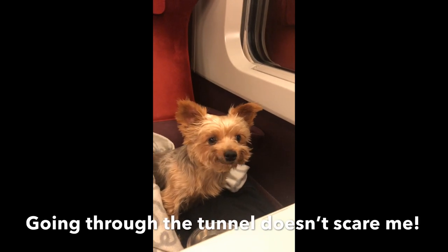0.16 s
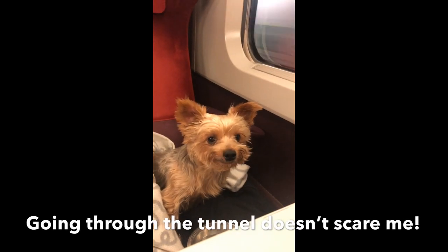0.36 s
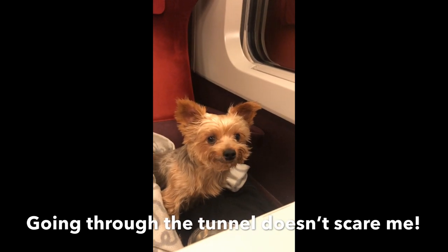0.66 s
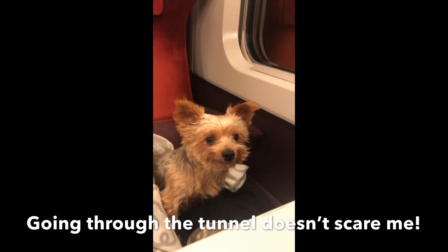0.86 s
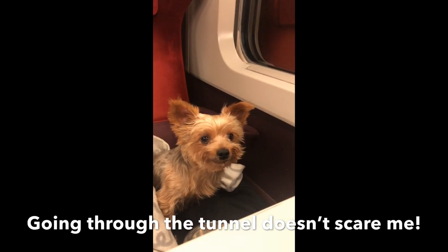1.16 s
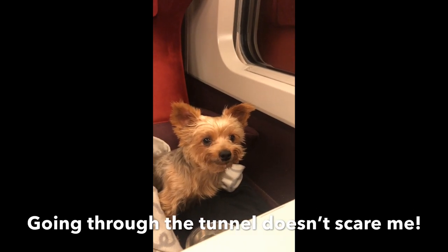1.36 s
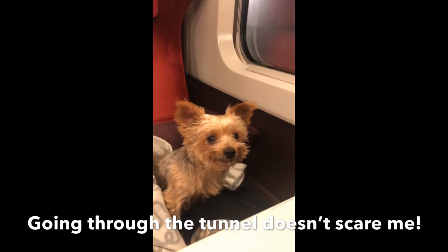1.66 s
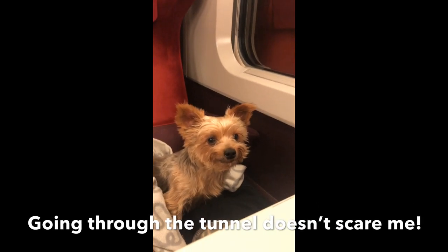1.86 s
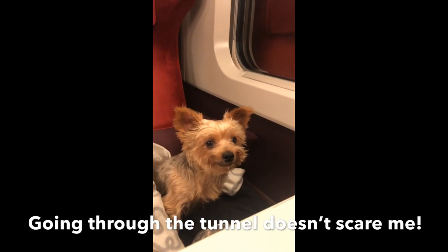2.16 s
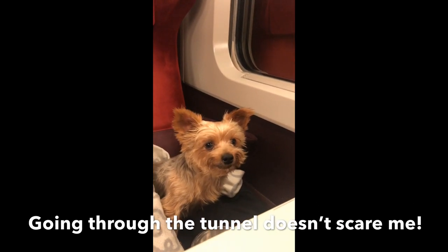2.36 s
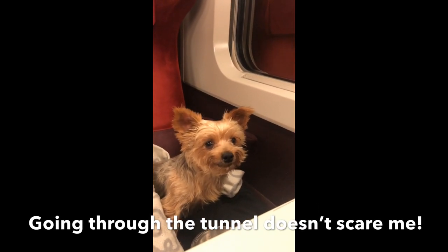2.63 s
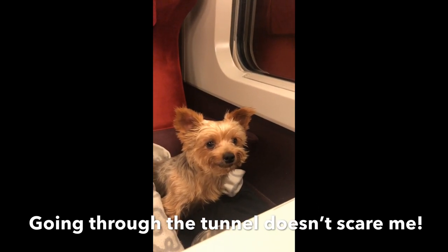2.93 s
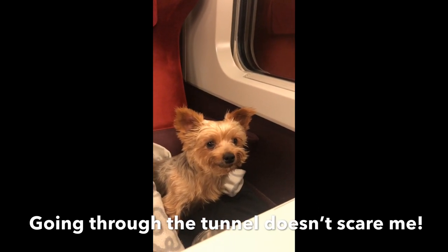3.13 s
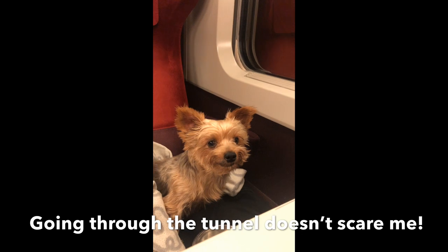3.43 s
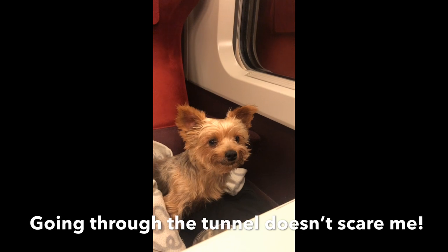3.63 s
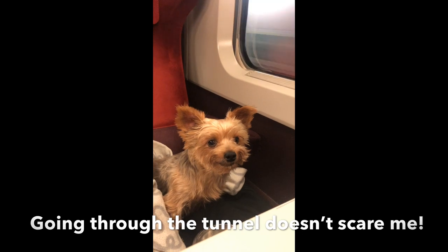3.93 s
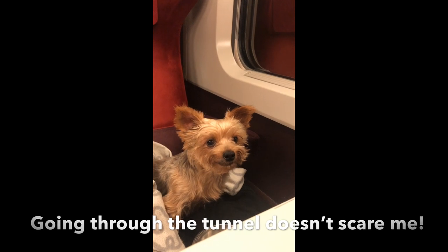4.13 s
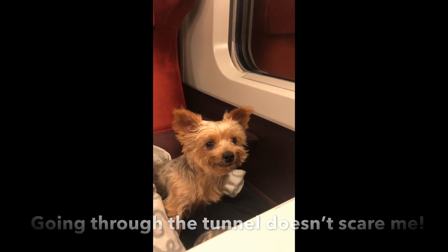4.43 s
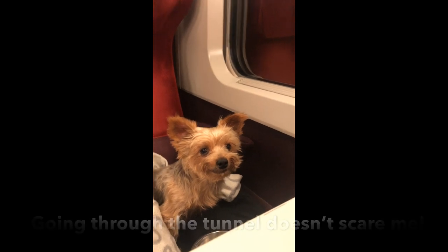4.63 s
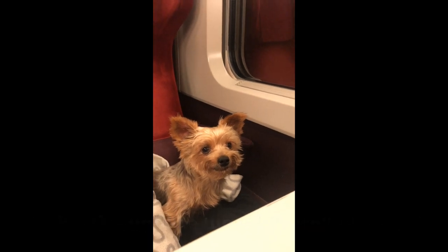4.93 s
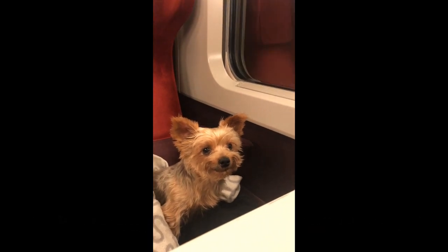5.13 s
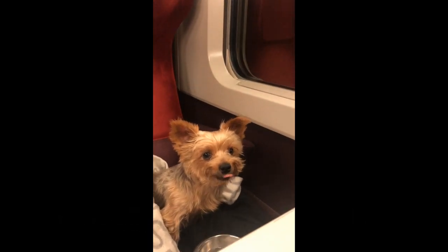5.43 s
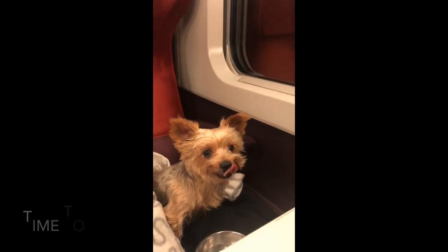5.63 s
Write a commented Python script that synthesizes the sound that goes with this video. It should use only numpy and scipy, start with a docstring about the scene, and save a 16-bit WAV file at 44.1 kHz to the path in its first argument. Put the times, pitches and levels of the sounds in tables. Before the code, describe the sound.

A muffled, steady train rumble fills the carriage, its deep tones fluttering unevenly and a very faint airy whine above. Small, bright crackles and soft fabric-like rubs occur nearby in irregular clusters, busiest from about one to three and a half seconds. They thin out, leaving the roar, before a little rustling resumes after five seconds. Mono phone pickup; the dog makes no sound.

```python
"""Inside a railway carriage in a tunnel: wheel and rail roar comes through floor and walls as shaped noise.
The car body booms in three low wavering tones, and faint narrow noise bands sing above the roar.
Close by, something like a wrapper or a coat rustles and crackles now and then: patchy friction hiss,
quick rubs and snaps of ringing noise, thin sliding hisses and a few harmonic squeaks."""
import sys
import numpy as np
from scipy import signal
from scipy.fft import rfft, irfft
from scipy.io import wavfile
from scipy.ndimage import uniform_filter1d

SR = 44100
rng = np.random.default_rng(int(sys.argv[2]) if len(sys.argv) > 2 else 0)


def unload_wav(signal):
    """Save mono or channel-first audio to the path in sys.argv[1] as 16-bit WAV at rate SR, clipped to [-1, 1]."""
    wavfile.write(
        sys.argv[1],
        SR,
        np.round(np.clip(np.atleast_2d(signal).T, -1, 1) * 32767).astype(np.int16),
    )


def boost_factor(decibels):
    """Convert a level in decibels to a linear amplitude factor."""
    exponent = np.asarray(decibels, float) / 20
    return 10 ** exponent


N = 255118  # length [samples]

# Colour of the wheel and tunnel-air roar: (frequency [Hz], relative density [dB per Hz])
ROAR_COLOUR = [(15, -40), (25, -35), (59, -2), (126, -2.5), (200, -13.5), (425, -13), (486, -13),
               (527, -18), (587, -15), (654, -17.5), (729, -16.5), (1120, -29.5), (1930, -38),
               (2730, -44.5), (15800, -76.5)]
# Slow swell of the roar: (time [s], level [dB])
ROAR_SWELL = [(0, -32), (.6, -32.5), (1.3, -32), (2.0, -32.5), (2.8, -32.5), (3.5, -33), (4.3, -32),
              (5.0, -33), (5.78, -33)]
# Panel resonances shaping the roar: (frequency [Hz], width [Hz], boost or cut [dB])
PANEL_RESONANCES = [(157.4, 9.8, -9), (280, 71, 3), (500, 69, 4.5), (590, 46, 3.5), (890, 68, 1.5),
                    (1900, 320, 7), (2380, 270, 4.5), (3120, 770, -0.5), (6340, 1000, 2)]
# Bands singing above the roar: (frequency [Hz], drift [Hz], noise spread to each side [Hz],
# level at the start [dB], fade [dB per s]; a negative fade grows)
SINGING_BANDS = [(2480, 2.3, 4.6, -71.5, -0.5), (2534, 30, 52, -71, -0.5), (1897, 4.03, 12, -64.5, 1)]
# Soft continuous rustle, before its ticks: (time [s], level [dB])
RUSTLE_LEVEL = [(0, -62.5), (.12, -63), (.42, -65.5), (.8, -82), (1.0, -71), (1.45, -73), (1.9, -73),
                (2.05, -63.5), (2.3, -75), (2.75, -81), (2.95, -68), (3.2, -82), (3.42, -64), (3.56, -86),
                (3.85, -68), (4.0, -84), (5.0, -80), (5.1, -67.5), (5.6, -63.5), (5.78, -53)]
# Colour of the rustle: (frequency [Hz], relative density [dB per Hz])
RUSTLE_COLOUR = [(1500, -37), (2600, 4), (4000, -2.5), (7500, -10.5), (10000, -14), (16000, -18)]
# Body modes: (frequency [Hz], pitch waver [Hz], flutter depth [0-1], random surge [dB])
BODY_MODES = [(53.07, 5.14, 0.63, 2), (76.2, 7.2, 0.25, 3.5), (119.2, 8.04, 0.62, 1.5)]
# Slow levels of the body modes: (time [s], low mode [dB], middle mode [dB], upper mode [dB])
BODY_LEVELS = [(0, -34.5, -33, -33.5), (.4, -40.5, -31, -38), (.9, -33.5, -36, -37), (1.4, -33.5, -36, -38),
               (2.0, -40, -37.5, -39), (2.6, -38, -35.5, -41), (3.2, -38.5, -37.5, -37.5),
               (3.75, -33.5, -42, -36.5), (4.1, -39, -31.5, -38), (4.6, -36.5, -41.5, -39),
               (5.2, -35.5, -34, -37), (5.78, -42, -35.5, -34.5)]
# Quick rubs: (start [s], nominal length [s], level before shaping [dB], ring [Hz], ring boost [dB])
SCRAPES = [(0.082, .018, -61, 9300, 15), (0.468, 0.022, -54, 7800, 9), (0.995, 0.042, -48, 7600, 6),
           (1.26, 0.032, -59, 9500, 5), (1.912, .022, -62, 5500, 8.5), (1.99, 0.067, -69, 8800, 14),
           (2.064, 0.047, -52, 5000, 3), (2.168, .016, -67, 11000, 3), (2.268, 0.046, -65, 9500, 6),
           (2.33, .022, -59, 6200, 4), (2.354, 0.017, -60.5, 6200, 6), (2.503, 0.033, -69, 13000, 3),
           (2.835, .03, -70, 6000, 10), (3.01, .06, -74, 9700, 12), (3.068, 0.024, -62, 9800, 2),
           (3.352, 0.03, -54, 6000, 0), (5.07, 0.031, -64, 6700, 6.5)]
# Thin hisses: (start [s], length [s], start pitch [Hz], end pitch [Hz],
# noise spread to each side [Hz], level before tapering [dB])
THIN_HISSES = [(0.16, 0.09, 6500, 7100, 700, -73), (0.235, 0.135, 7000, 6200, 600, -69),
               (0.995, 0.045, 3500, 3100, 500, -60), (1.0, 0.06, 6400, 6800, 500, -63),
               (1.035, 0.085, 8700, 7950, 110, -74), (1.262, 0.02, 3900, 3800, 400, -60),
               (1.7, 0.09, 2720, 2580, 60, -61)]
# Snaps: (cue time [s], level before trim and shaping [dB], ring [Hz], ring boost [dB], tail t60 [s])
CRACKLES = [(0.241, -60, 12000, 0, .02), (0.762, -46, 4270, 9, 0.091), (0.96, -53.5, 8600, 7, 0.28),
            (1.127, -64, 8300, 6, .015), (1.291, -45.5, 2050, 15, 0.049), (1.384, -47, 4300, 6, 0.096),
            (1.548, -55, 4500, 15, 0.03), (2.236, -60, 9000, 6, .015), (2.300, -64, 14000, 6, .015),
            (2.406, -64, 10500, 8, .03), (2.472, -56, 9000, 10, 0.016), (2.865, -66, 11800, 12, .03),
            (2.983, -57, 7100, 9, 0.12), (3.342, -49, 6500, 1, 0.11), (3.450, -47.5, 8000, 6.5, 0.097),
            (5.316, -64, 13500, 9, .03)]
# Squeaks: (start [s], length [s], start pitch [Hz], end pitch [Hz], peak of the fundamental [dB])
SQUEAKS = [(0.998, .04, 3250, 3050, -54), (1.260, .02, 3050, 3110, -48), (1.667, .024, 2850, 2800, -55)]


def evened(x):
    """Scales to rms 1."""
    return x / np.sqrt(np.mean(x ** 2) + 1e-20)


def read(points, hz):
    """Reads a spectrum on a log-frequency axis."""
    f, value = np.transpose(points)
    return np.interp(np.log(hz + 1), np.log(f + 1), value)


def along(rows):
    """Reads the columns of a curve at every sample."""
    s, *columns = np.transpose(rows)
    return [np.interp(np.arange(N) / SR, s, column) for column in columns]


def coloured(x, db_at):
    """Filters x by a gain given in dB as a function of Hz."""
    gain = boost_factor(db_at(np.fft.rfftfreq(len(x), 1 / SR)))
    return irfft(rfft(x) * gain, len(x))


def add(mix, s, sound):
    """Mixes a sound in at s seconds."""
    part = mix[round(s * SR):][:len(sound)]
    part += sound[:len(part)]


def wander(size, hz):
    """Smooth random drift, mostly slower than hz, rms 1."""
    noise = rng.standard_normal(size)
    return evened(coloured(noise, lambda f: -40 * np.log10(1 + (f / hz) ** 2)))


def patchy_noise(db, window, patchy_db, bins, frames):
    """Random short-time spectra of colour db, in patches some bins wide and some frames long, rms 1."""
    hop = window // 4
    real, imaginary, patches = rng.standard_normal((N // hop + 5, window // 2 + 1, 3)).T
    patches = uniform_filter1d(patches, bins, 0)
    patches = evened(uniform_filter1d(patches, frames, 1))
    spectra = (real + 1j * imaginary) * boost_factor(db[:, None] + patchy_db * patches)
    return evened(signal.istft(spectra, nperseg=window, noverlap=window - hop)[1][:N])


def noise_band(pitch, width):
    """Noise about width Hz to each side of a moving pitch, rms near 1."""
    angle = 2 * np.pi * np.cumsum(pitch) / SR
    size = len(pitch)
    return wander(size, width) * np.cos(angle) + wander(size, width) * np.sin(angle)


def roar():
    """Wheel and tunnel-air noise through the walls, coloured by panels, thinned where the body modes take over."""
    hz = np.fft.rfftfreq(2048, 1 / SR)
    db = read(ROAR_COLOUR, hz)
    for panel_hz, width, boost_db in PANEL_RESONANCES:
        db += boost_db / (1 + (2 * (hz - panel_hz) / width) ** 2)
    db -= 6 * ((hz > 36) & (hz < 150))
    noise = patchy_noise(db, window=2048, patchy_db=-0.02, bins=20, frames=8)
    return noise * boost_factor(along(ROAR_SWELL)[0])


def sing(hz, drift_hz, width, db, fade_db):
    """A narrow band of noise that wanders slowly in pitch and strength."""
    band = noise_band(hz + drift_hz * wander(N, 1.5), width)
    level_db = db - fade_db * np.arange(N) / SR + 1.8 * wander(N, 2.5)
    return boost_factor(level_db) * band


def rustle():
    """Fine friction hiss in patches of pitch and time, with small uneven ticks that follow its strength."""
    ticks_per_s, tick_t60 = 50, .04  # t60 [s]
    tick_db = 2.5 * np.minimum(rng.exponential(1, N), 2)
    ticks = (rng.random(N) < ticks_per_s / SR) * boost_factor(tick_db)
    decay = .25 * boost_factor(-60 * np.arange(2048) / SR / tick_t60)
    lumps = 1 + signal.oaconvolve(ticks, decay)[:N]
    db = read(RUSTLE_COLOUR, np.fft.rfftfreq(256, 1 / SR))
    friction = patchy_noise(db, window=256, patchy_db=2.0, bins=10, frames=16)
    return boost_factor(along(RUSTLE_LEVEL)[0]) * lumps * friction


def boom(level_db, hz, waver_hz, flutter, surge_db):
    """A body mode: a tone whose pitch wavers and whose strength surges and flutters as the track shakes it."""
    waver_rate, surge_rate, flutter_rate = 14.48, 9.3, 46  # [Hz]; uneven track sets the surging
    turns = np.cumsum(hz + waver_hz * wander(N, waver_rate)) / SR + rng.random()
    strength = boost_factor(surge_db * wander(N, surge_rate)) * (1 + flutter * wander(N, flutter_rate))
    return boost_factor(level_db) * evened(strength * np.sin(2 * np.pi * turns))


def burst(size, ring_hz, ring_db, treble_db, grain_db):
    """Grainy noise with one broad ring standing out of a sloping spectrum, plus uneven smaller rings."""
    noise = rng.standard_normal(size) * boost_factor(grain_db * wander(size, 500))
    # treble_db holds for an 8 kHz ring; higher rings are brighter, by 1.5 dB per octave
    high_db = treble_db + 1.5 * np.log2(ring_hz / 8000)
    slope = [(900, -34), (2400, 5), (3500, -0.5), (13000, high_db), (20000, high_db)]
    uneven_db = 2.5 * rng.standard_normal(30)

    def colour(f):
        """Slope, main ring and smaller rings in dB."""
        ring = ring_db / (1 + ((f - ring_hz) / (0.15 * ring_hz)) ** 2)
        return read(slope, f) + ring + np.interp(f, np.linspace(0, SR / 2, 30), uneven_db)

    return evened(coloured(noise, colour))


def scrape(s, length, db, ring_hz, ring_db):
    """A quick rub: ringing friction noise that swells fast and trails off past its nominal length."""
    u = np.arange(round(3 * length * SR)) / (length * SR)  # time in nominal lengths
    swell = np.sin(np.pi / 2 * np.minimum(u / 0.28, 1)) ** 2
    trail = boost_factor(-20 * np.maximum(u - .55, 0))
    noise = burst(len(u), ring_hz, ring_db, treble_db=-10, grain_db=0.65)
    return s, boost_factor(db) * swell * trail * noise


def thin_hiss(s, length, from_hz, to_hz, width, db):
    """A narrow band of noise sliding in pitch."""
    size = round(length * SR)
    band = noise_band(np.linspace(from_hz, to_hz, size), width)
    return s, boost_factor(db) * band * signal.windows.tukey(size, .6)


def crackle(s, db, ring_hz, ring_db, t60):
    """A snap: quick start, one hard tick at the peak, then a short tail from the seat and window."""
    tick_db, trim_db = 10, -3.0
    t = np.arange(8192) / SR
    rise = .0003 + 0.045 * t60  # [s]; a longer snap also takes longer to build
    after = np.maximum(t - rise, 0)
    tail = boost_factor(-60 * after / t60)
    peak = 0.6 * boost_factor(-60 * abs(t - rise) / 0.0068)
    shape = np.minimum(t / rise, 1) ** 1.6 * (tail + peak)
    u = 2 * np.pi * ring_hz * after
    tick = boost_factor(tick_db) * (t > rise) * (1 - u) * np.exp(-u)
    noise = burst(len(t), ring_hz, ring_db, treble_db=-9, grain_db=0.87)
    return s - .001, boost_factor(db + trim_db) * (tick + shape * noise)  # starts 1 ms ahead of its cue


def squeak(s, length, from_hz, to_hz, db):
    """Fast stick-slip: an unsteady stack of five harmonics, each 10 dB below the last."""
    size = round(length * SR)
    pitch = np.linspace(from_hz, to_hz, size) + 85 * wander(size, 1500)
    turns = np.cumsum(pitch) / SR
    stack = sum(boost_factor(-10.0 * k) * np.sin(2 * np.pi * (k + 1) * turns) for k in range(5))
    return s, boost_factor(db) * stack * signal.windows.hann(size)


def scene():
    """Carriage noise with the near rustles and crackles on top."""
    mix = roar() + sum(sing(*band) for band in SINGING_BANDS) + rustle()
    for level_db, mode in zip(along(BODY_LEVELS), BODY_MODES):
        mix += boom(level_db, *mode)
    near = [(SCRAPES, scrape), (THIN_HISSES, thin_hiss), (CRACKLES, crackle), (SQUEAKS, squeak)]
    for rows, source in near:
        for row in rows:
            add(mix, *source(*row))
    return mix[None]


def roll_off(x):
    """The treble ends steeply here."""
    return signal.sosfilt(signal.butter(12, 15950, fs=SR, output="sos"), x)


def record(dry):
    """A phone microphone with a faint hiss of its own, losing the deepest bass and the top."""
    low_cut_hz, top_hz, hiss_db = 36, 15770, -82  # hiss level before the filters
    heard = dry + boost_factor(hiss_db) * rng.standard_normal(dry.shape)
    low_cut = signal.butter(N=4, Wn=low_cut_hz, btype="high", fs=SR, output="sos")
    heard = signal.sosfilt(low_cut, heard)
    heard = coloured(heard[0], lambda f: -25. * (f > top_hz))[None]
    heard *= np.minimum(np.arange(N) / (.002 * SR), 1)  # soft 2 ms start
    return roll_off(heard)


dry = scene()
out = record(dry)
unload_wav(out)
```